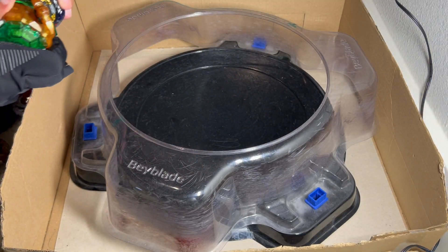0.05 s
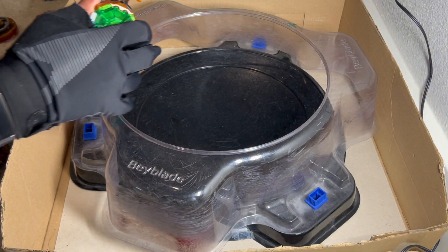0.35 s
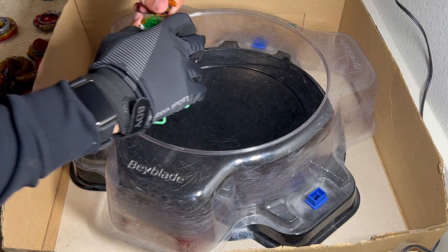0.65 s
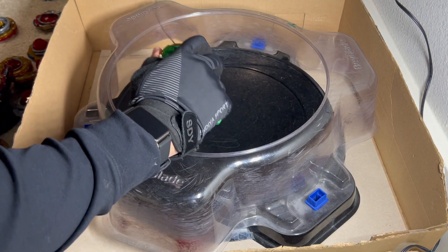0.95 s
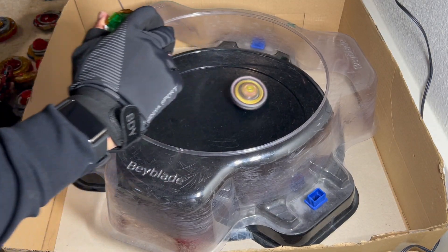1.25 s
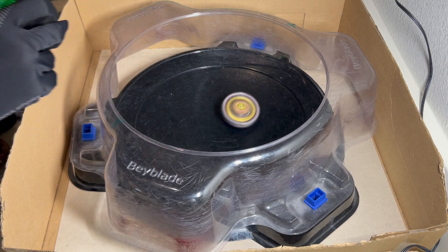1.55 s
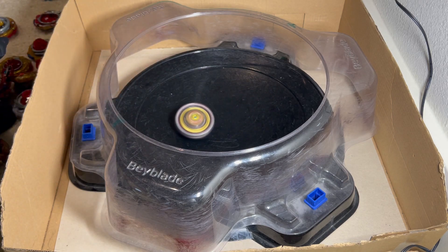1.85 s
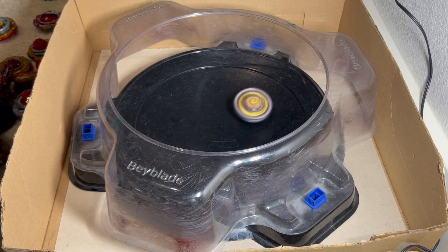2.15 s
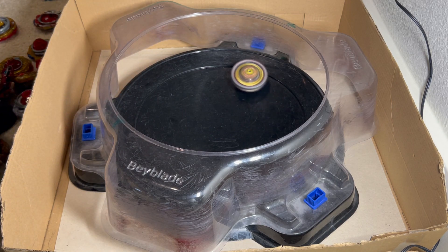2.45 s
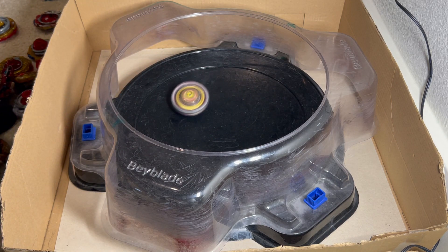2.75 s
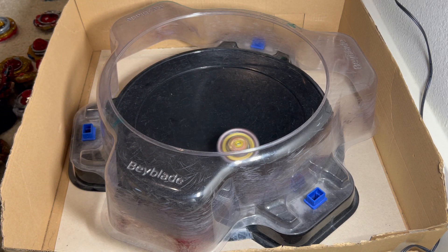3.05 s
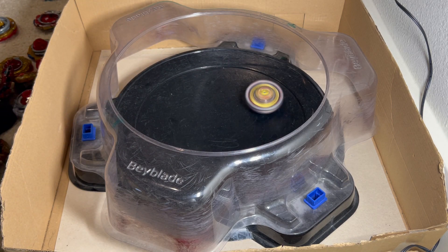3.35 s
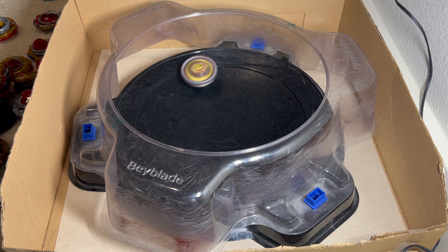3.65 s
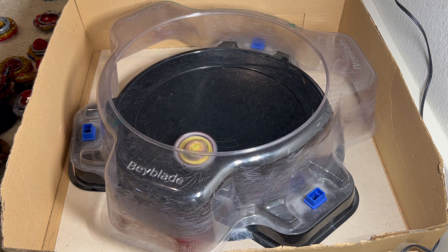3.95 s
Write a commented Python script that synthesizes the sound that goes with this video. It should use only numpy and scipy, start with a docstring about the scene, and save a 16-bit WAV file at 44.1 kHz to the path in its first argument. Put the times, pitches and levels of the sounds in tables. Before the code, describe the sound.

A toy top spins in a plastic bowl, heard close inside a cardboard box. First its launcher clicks and zips upward in pitch; the top snaps free and bounces, the cord rattles back, and humming and grinding follow.

```python
"""A toy top spins in a plastic bowl inside a cardboard box, heard through a stereo microphone pair.
Its geared cord launcher clicks, squeaks and whines up in pitch; the top snaps free and bounces into
the bowl while the cord rattles back. As the top circles, its unbalance hums through the bowl and its
tip grinds over the plastic, rough on the fast stretches and almost smooth where it slows high on the
slope. The close walls of the box add a short tail, with a quiet room behind."""
import sys
import numpy as np
from scipy import signal
from scipy.fft import rfft, irfft, next_fast_len
from scipy.io import wavfile
from scipy.ndimage import uniform_filter1d, map_coordinates

SR = 44100
rng = np.random.default_rng(int(sys.argv[2]) if len(sys.argv) > 2 else 0)


def bounce(signal):
    """Save signal as a 16-bit WAV file at the path given by the first command-line argument."""
    frames = np.transpose(np.atleast_2d(signal))
    limited = np.clip(frames, -1, 1)
    pcm = np.round(limited * 32767).astype(np.int16)
    wavfile.write(sys.argv[1], SR, pcm)


N = 176400

# Colour of the launcher's case. Each row: frequency in Hz, relative level in dB.
CASE_SPECTRUM = [(300, -18.5), (800, -18), (1100, -9), (2200, -7.5), (2950, 1.5), (3800, 2), (4300, -3),
                 (8600, -4), (11500, -5.5), (15500, -15.5)]
# Midrange of the tip on the bowl. Each row: frequency in Hz, relative level in dB.
GRIND_SPECTRUM = [(450, -48), (850, -2), (1500, 0.5), (2600, -1.5), (3300, -5.5), (4100, -4), (4800, -9),
                  (8000, -23.5)]
# Treble of the tip and of the cord. Each row: frequency in Hz, relative level in dB.
HISS_SPECTRUM = [(2500, -61), (4200, -8), (6500, -1.5), (7500, 4), (8800, 2.5), (11500, -3.5), (16000, -9)]


def amp(db):
    return 10 ** (np.asarray(db) / 20)


def unit(x):
    return x / np.sqrt(np.mean(x ** 2) + 1e-20)


def clock():
    return np.arange(N) / SR


def along(points, hz):
    """Read (Hz, value) points on a log frequency axis."""
    knots_hz, values = np.transpose(points)
    return np.interp(np.log(hz + 1), np.log(knots_hz + 1), values)


def gains(rows):
    """One gain curve for each dB column after the time column, silent outside the table."""
    times, *columns = np.transpose(rows)
    times = np.r_[times[0] - .01, times, times[-1] + .02]
    return [amp(np.interp(clock(), times, np.r_[-120, db, -120])) for db in columns]


def wobble(rate):
    """A smooth random curve, rate knots a second."""
    return map_coordinates(rng.standard_normal(int(N * rate / SR) + 4), [clock() * rate])


def filtered(x, response):
    """x through a response given as a function of Hz."""
    size = next_fast_len(N + SR // 2)
    return irfft(rfft(x, size) * response(np.fft.rfftfreq(size, 1 / SR)), size)[..., :N]


def coloured(x, spectrum):
    """x through a body with this spectrum, at rms 1."""
    return unit(filtered(x, lambda hz: amp(along(spectrum, hz))))


def noise(spectrum):
    return coloured(rng.standard_normal(N), spectrum)


def grains(rate):
    """Tiny impacts of random size, about rate a second."""
    return unit((rng.random(N) < rate / SR) * rng.standard_normal(N))


def once_a_turn(turns, depth):
    """A gate of rms 1 that peaks once in every turn."""
    return np.exp(depth * np.cos(2 * np.pi * turns)) / np.sqrt(np.i0(2 * depth))


def decay(start, t60, attack_s):
    """Envelope of a blow."""
    t = np.maximum(clock() - start, 0)
    return amp(-60 * np.minimum(t / t60, 3)) * (1 - np.exp(-t / attack_s))


def swell(centre, length, db):
    """A smooth rise and fall around one moment."""
    return amp(db) * np.exp(-2 * ((clock() - centre) / length) ** 2)


def ring(modes, start, attack_s):
    """Damped modes struck at one moment, a little differently each time."""
    t = np.arange(SR // 3) / SR
    tone = sum((-1) ** k * amp(db + rng.normal(0, 1.0) - 60 * t / t60) * np.sin(2 * np.pi * hz * t)
               for k, (hz, db, t60) in enumerate(modes))
    attack = 1 - np.exp(-t / attack_s)
    return np.r_[np.zeros(round(start * SR)), tone * attack, np.zeros(N)][:N]


def room_tone():
    """The quiet room around the box, mostly low rumble."""
    # Each row: frequency in Hz, relative level in dB.
    room_spectrum = [(20, -31), (59, 1.5), (200, -15.5), (1000, -20.5), (15000, -49)]
    return amp(-68.5) * noise(room_spectrum)


def launcher():
    """Gear teeth whine and the ratchet rattles ever faster; the cord winds in before and after."""
    # Gear speed in the pull. Each row: time in seconds, tooth rate in Hz.
    tooth_rate = [(0.714, 200), (.745, 420), (.76, 570), (.8, 1050), (.84, 1490), (0.88, 1820),
                  (0.909, 1950)]
    # Gear whine. Each row: multiple of the tooth rate, relative level in dB.
    whine_partials = [(1, -13), (2, -5.5), (3, -10)]
    # The cord settling, pulled, then winding back. Each row: time in seconds, relative level in dB.
    settle_levels = [(0, -33), (.04, -36.5), (.06, -41), (.075, -50.5), (.14, -64), (.25, -62), (.34, -82),
                     (.48, -95)]
    pull_levels = [(.705, -56), (.745, -46), (.78, -28), (.815, -20), (.88, -17.5), (.908, -20),
                   (.913, -26), (.938, -22.5), (.95, -37)]
    rewind_levels = [(1.344, -38), (1.356, -21.5), (1.365, -20.5), (1.373, -19), (1.386, -17),
                     (1.395, -22.5), (1.402, -24), (1.425, -35)]
    (settle,), (pull,), (rewind,) = gains(settle_levels), gains(pull_levels), gains(rewind_levels)
    teeth = np.cumsum(np.interp(clock(), *np.transpose(tooth_rate)) * (1 + .015 * wobble(180))) / SR
    ratchet = once_a_turn(teeth / 6, depth=0.19)  # one click every six teeth
    rattle = coloured(grains(30000) * ratchet * once_a_turn(teeth, depth=0.53), CASE_SPECTRUM)
    driven = clock() < tooth_rate[-1][0]  # the gears stop when the cord runs out
    whine = driven * sum(amp(db + 3.5 * wobble(70)) * np.sin(2 * np.pi * k * teeth + .3 * wobble(500))
                         for k, db in whine_partials)
    spool = grains(16000) * amp(2.6 * wobble(299.5))
    case, cord = coloured(spool, CASE_SPECTRUM), coloured(spool, HISS_SPECTRUM)
    settling = settle * (amp(-3.5) * case + amp(-6.5) * cord)
    return settling + pull * (amp(-1) * rattle + whine) + rewind * case


def ratchet_clicks():
    """Single clicks of the ratchet sound through the launcher's case."""
    # Each row: start in seconds, level in dB.
    clicks = [(0.149, -42), (.169, -52), (.245, -51.5), (.665, -50), (0.68, -43), (0.718, -29), (.74, -24),
              (.754, -24.5), (0.764, -28), (0.773, -25.5), (0.782, -25), (0.9007, -8)]
    blows = sum(amp(db) * decay(start, t60=0.046, attack_s=0.00027) for start, db in clicks)
    return blows * noise(CASE_SPECTRUM)


def squeak():
    """Plastic gives one thin, rising squeak as the cord tightens."""
    start_s, length_s, pitch_hz, rise_hz_per_s = .702, 0.0226, 9940, 9000
    t = clock() - start_s
    envelope = np.interp(t, [0, .004, length_s - .003, length_s + 0.00202], [0, 0.98, 1.56, 0])
    return amp(-25) * envelope * np.sin(2 * np.pi * (pitch_hz + rise_hz_per_s * t / 2) * t)


def snap():
    """The top snaps off the launcher with a double crack and a short ring."""
    # Each row: frequency in Hz, relative level in dB, seconds to fall 60 dB.
    snap_modes = [(737, -6, 0.012), (1380, -18, 0.023), (1910, -9, 0.015), (2500, -9, .012),
                  (3670, -16, 0.0076)]
    start_s, gap_s = .9437, .0017
    cracks = sum(decay(start, t60=.008, attack_s=.0001) for start in (start_s, start_s + gap_s))
    ringing = ring(snap_modes, start_s, attack_s=0.00033)
    return amp(2.5) * ringing + amp(-14.5) * cracks * noise(CASE_SPECTRUM)


def bounces():
    """The top lands, bounces and later bumps the bowl, each time with a low thump and a clack."""
    # Each row: start in seconds, relative thump and clack levels in dB.
    hits = [(0.958, -27, -20.5), (1.003, -10.5, -19), (1.1168, -16, -23.5), (1.166, -18, -25),
            (1.207, -18.5, -24), (1.247, -23.5, -22), (1.285, -22.5, -25), (3.199, -28.5, -24.5),
            (3.876, -22, -23.5)]
    # Modes of the bowl. Each row: frequency in Hz, relative level in dB, seconds to fall 60 dB.
    bowl_modes = [(83.3, -9.5, 0.22), (122.6, -6, 0.12), (158, -0.5, 0.099), (232.7, -2.5, 0.086),
                  (331, -2, 0.075), (440, -6.5, 0.045)]
    thumps = sum(amp(db) * ring(bowl_modes, start, attack_s=0.0028) for start, db, _ in hits)
    clacks = sum(amp(db) * decay(start, t60=0.055, attack_s=0.0006) for start, _, db in hits)
    return thumps + clacks * (amp(-3) * noise(GRIND_SPECTRUM) + amp(-8) * noise(HISS_SPECTRUM))


def spin_turns():
    """Turns made by the top as friction slows it."""
    # Each row: time in seconds, turns a second.
    spin_rate = [(1.3, 115.5), (1.718, 107), (2.5, 107), (2.997, 102.7), (3.22, 103), (3.329, 104.3),
                 (3.549, 102), (3.748, 100), (4, 89)]
    return np.cumsum(np.interp(clock(), *np.transpose(spin_rate)) * (1 + 0.0044 * wobble(7))) / SR


def circling(x, echoes=3):
    """Echoes off the bowl's walls sweep the colour as the top circles."""
    orbit_s, first_delay_s, swing_s, echo_gain = 1.08, .0016, .0009, .3
    out = x
    for k in range(echoes):
        swing = swing_s * np.sin(2 * np.pi * (clock() / orbit_s + k / echoes))
        delay = (1 + k / 2) * first_delay_s + swing
        out = out + echo_gain * map_coordinates(x, [(clock() - delay) * SR])
    return unit(out)


def shifting(x, patchy_db):
    """Each spot of the bowl favours other resonances, so they come and go as the top travels."""
    spectra = signal.stft(x, nperseg=1024)[2]
    patches = uniform_filter1d(rng.standard_normal(spectra.shape), size=4, axis=0)  # across frequency
    patches = uniform_filter1d(patches, size=6, axis=1)  # across time
    return unit(signal.istft(spectra * amp(patchy_db * unit(patches)))[1][:N])


def grinding(turns):
    """The tip skips over the plastic in tiny impacts that bunch once a turn."""
    # Tip on the bowl. Each row: time in seconds, relative rumble, grind and hiss levels in dB.
    contact_levels = [(0.96, -29.5, -26, -40), (1.1, -45, -46.5, -56), (1.2, -41.5, -39, -43.5),
                      (1.29, -33, -32, -35), (1.45, -39.5, -31.5, -38), (1.53, -38.5, -29, -36.5),
                      (1.65, -33, -26.5, -31), (2.05, -32.5, -33.5, -36), (2.16, -29, -28, -31.5),
                      (2.45, -35.5, -33.5, -33), (2.5, -35, -37.5, -44.5), (2.63, -53.5, -50.5, -61),
                      (2.71, -49.5, -41.5, -45.5), (2.85, -35.5, -32.5, -31.5), (2.91, -28.5, -26.5, -32),
                      (2.95, -40, -35, -41), (3.34, -36, -30, -35), (3.57, -40, -41.5, -42),
                      (3.72, -50, -38, -40), (3.84, -37.5, -32, -29.5), (4.0, -36, -35, -45)]
    # Low end of the bowl under the tip. Each row: frequency in Hz, relative level in dB.
    rumble_spectrum = [(25, -60), (60, -13), (100, -16), (150, 1.5), (380, 0), (550, -1.5), (800, -9),
                       (1200, -16.5), (2500, -67)]
    low, mid, high = gains(contact_levels)
    bunching = .3 + .5 / (1 + (mid / amp(-40)) ** 2)  # the hiss pulses most under light contact
    hiss_pulse = once_a_turn(turns, bunching) * once_a_turn(2 * turns, depth=0.28)
    skips = amp(0.92 * wobble(45) + 0.99 * wobble(220))
    rumble = coloured(grains(2200) * skips * once_a_turn(turns, depth=0.49), rumble_spectrum)
    grind = coloured(grains(11000) * skips * once_a_turn(turns, depth=0.38), GRIND_SPECTRUM)
    hiss = coloured(grains(16000) * skips * hiss_pulse, HISS_SPECTRUM)
    return (amp(4) * low * circling(rumble)
            + mid * shifting(circling(grind), patchy_db=2.5)
            + amp(1) * high * circling(hiss))


def hum(turns):
    """The unbalanced top pushes the bowl once a turn; the tip's chatter roughens the overtones."""
    # Each row: time in seconds, relative levels in dB of the first four multiples of the spin.
    hum_levels = [(1.25, -45.5, -33.5, -34, -38.5), (1.96, -32, -34, -32.5, -37.5),
                  (2.35, -39, -34, -33.5, -33), (2.54, -32, -48, -29.5, -35.5), (2.6, -36, -40, -55, -56),
                  (2.66, -45, -54, -38, -43.5), (2.81, -33, -34, -29.5, -31.5),
                  (3.02, -40, -32.5, -37.5, -37), (3.39, -37, -32, -31, -39), (3.6, -36.5, -50, -34.5, -31),
                  (3.79, -43, -26, -32.5, -33.5), (3.9, -37.5, -40, -41, -48), (4.0, -43, -35, -44, -41)]
    # Higher overtones. Each row: multiple of the spin, level in dB against the fourth.
    overtones = [(5, -7), (6, -11)]
    levels = gains(hum_levels)
    partials = list(enumerate(levels, start=1)) + [(k, amp(db) * levels[-1]) for k, db in overtones]
    uneven = turns + .012 * wobble(70)
    tone = sum(gain * amp(1.6 * wobble(25.08)) * np.sin(2 * np.pi * (k * uneven + rng.random()))
               for k, gain in partials)
    return amp(1.5) * tone


def judders(turns):
    """The tip digs in on the slope and knocks once a turn, unevenly, and the bowl booms."""
    # Each row: centre in seconds, length in seconds, level in dB.
    digs = [(1.548, 0.097, -24), (2.915, 0.067, -31), (3.246, 0.068, -22.5), (3.887, 0.057, -21.5)]
    # Boom of the bowl. Each row: frequency in Hz, relative level in dB.
    boom_spectrum = [(90, -55), (200, -13.5), (330, 10), (420, 1), (600, -40), (1500, -40)]
    knocks = once_a_turn(turns + .04 * wobble(90), depth=8) * amp(1.5 * wobble(110))
    return sum(swell(*dig) for dig in digs) * coloured(knocks, boom_spectrum)


def bowl_singing():
    """Here and there the scraping tip sets one resonance of the bowl singing for a moment."""
    # Each row: centre in seconds, pitch in Hz, level in dB.
    notes = [(1.61, 1490, -33), (2.24, 907, -33), (3.05, 1160, -35), (3.24, 1100, -36.5)]
    return sum(swell(centre, length=0.049, db=db) * np.sin(2 * np.pi * hz * clock() + wobble(70))
               for centre, hz, db in notes)


def box_at_microphones(direct):
    """Close walls add a short tail, heard by a pair whose phase difference turns through the treble."""
    # Colour of the wall echoes. Each row: frequency in Hz, relative level in dB.
    echo_spectrum = [(150, -25.5), (450, -11.5), (1100, -3), (2000, -4.5), (4000, -8.5), (6000, -5),
                     (8500, -11.5), (14000, -7)]
    # Balance of the pair. Each row: frequency in Hz, left over right in dB.
    balance = [(250, -0.5), (550, -5.5), (1200, 1), (3000, 3), (10000, 0)]
    # Phase between the microphones. Each row: frequency in Hz, lead of the left in radians.
    pair_phase = [(1000, .2), (1500, -1), (2300, .7), (4500, .4), (5900, -1), (6800, .2), (7950, 0),
                  (11200, -6.28), (11800, -6.28), (15150, -12.57)]
    tail_t60_s, narrow_above_hz = 0.1, 7200
    t = np.arange(SR // 4) / SR
    tail = rng.standard_normal((2, len(t))) * amp(-60 * t / tail_t60_s)
    echoes = signal.fftconvolve(direct[None], tail / np.linalg.norm(tail[0]), axes=1)[:, :N]
    common, side = filtered(echoes, lambda hz: amp(along(echo_spectrum, hz)))
    lead = lambda hz: np.interp(hz, *np.transpose(pair_phase))
    # In the high treble the image narrows wherever the pair is in or out of phase.
    side = filtered(side, lambda hz: np.where(hz > narrow_above_hz, np.abs(np.sin(lead(hz))), 1))
    sign = np.array([[1], [-1]])  # left, right
    pair = direct + amp(-6) * common + sign * side
    return filtered(pair, lambda hz: amp(sign * along(balance, hz) / 2) * np.exp(1j * sign * lead(hz) / 2))


def scene():
    """Launcher, landing and spinning top in the box, over a quiet room."""
    turns = spin_turns()
    top = grinding(turns) + bowl_singing() + hum(turns) + judders(turns)
    launch = launcher() + ratchet_clicks() + squeak() + snap() + bounces()
    return box_at_microphones(launch + top + room_tone())


def record(dry):
    """The recorder keeps nothing above its band limit."""
    limit_hz, slope_width_hz = 16100, 400
    return filtered(dry, lambda hz: np.clip((limit_hz - hz) / slope_width_hz + .5, 0, 1))


dry = scene()
out = record(dry)
bounce(out)
```